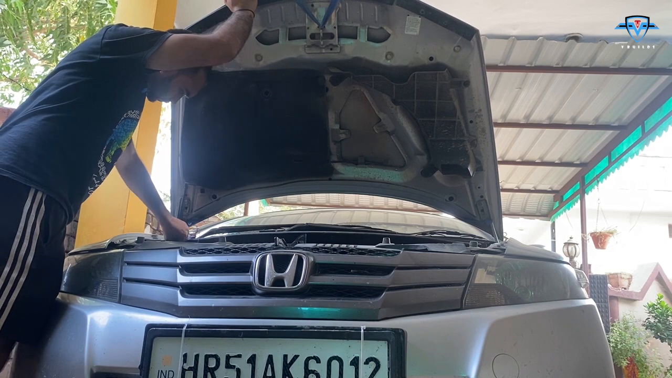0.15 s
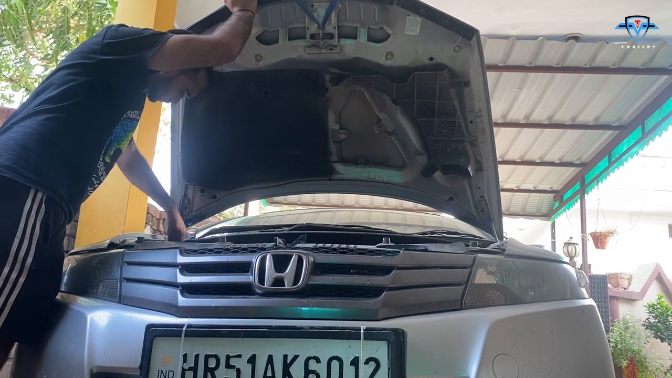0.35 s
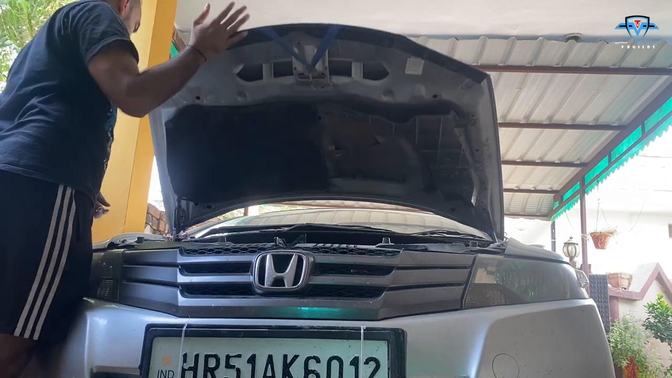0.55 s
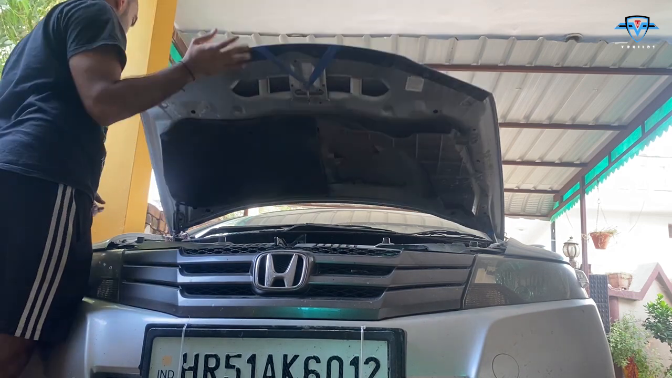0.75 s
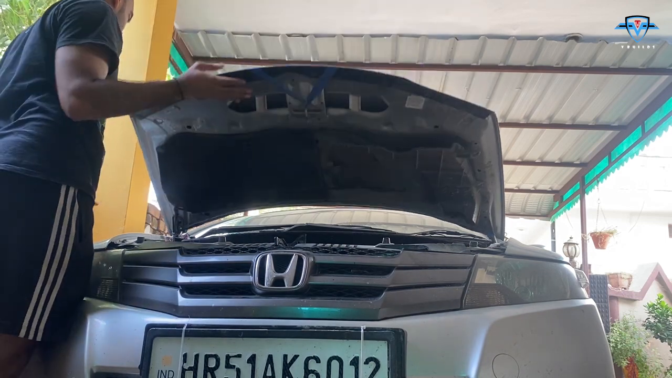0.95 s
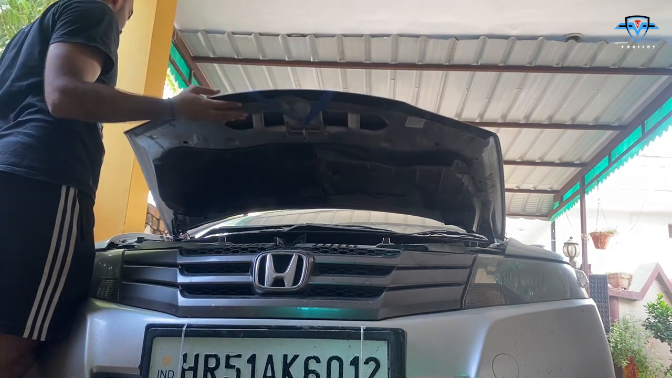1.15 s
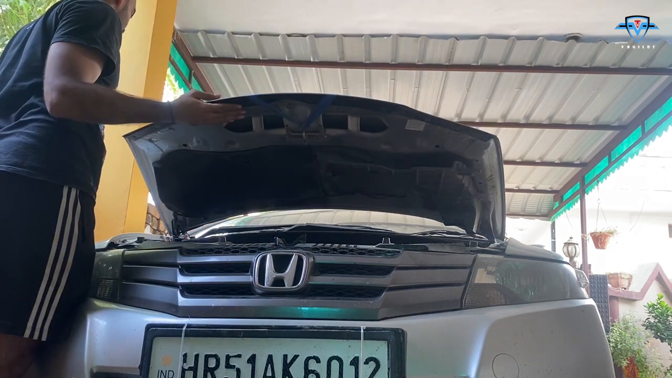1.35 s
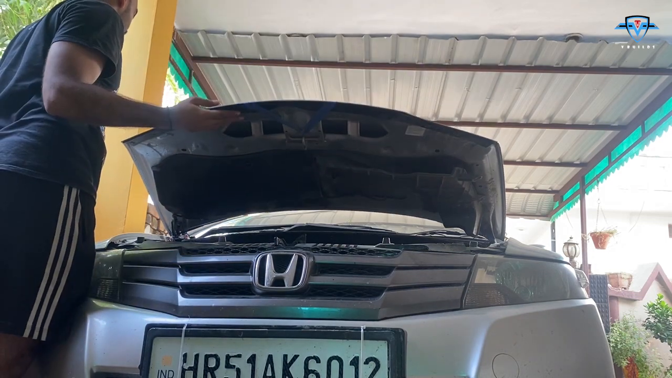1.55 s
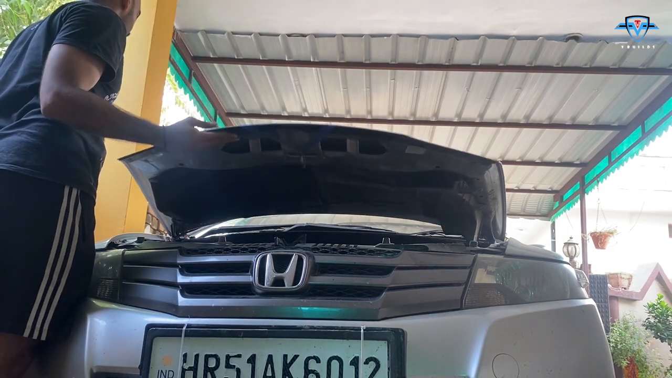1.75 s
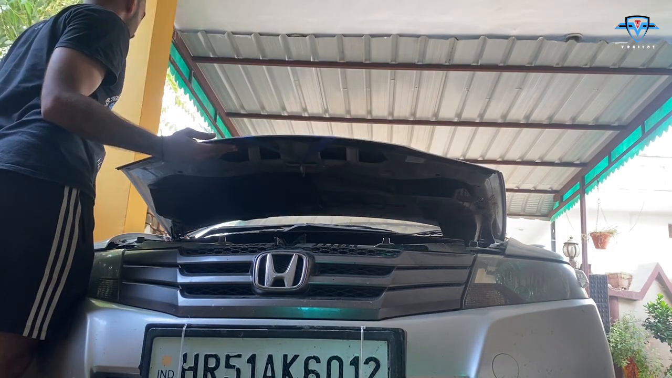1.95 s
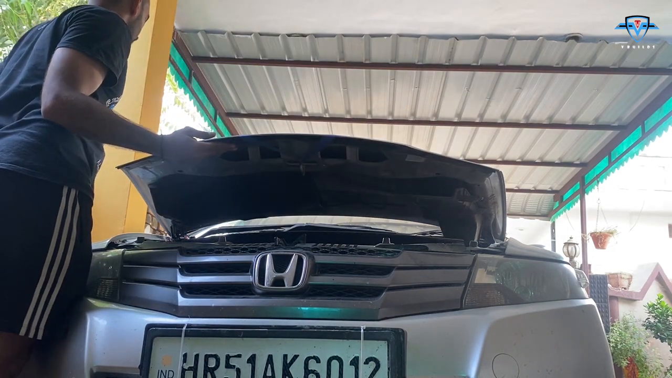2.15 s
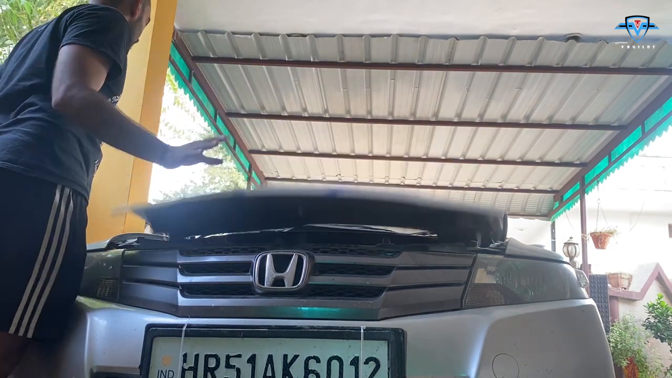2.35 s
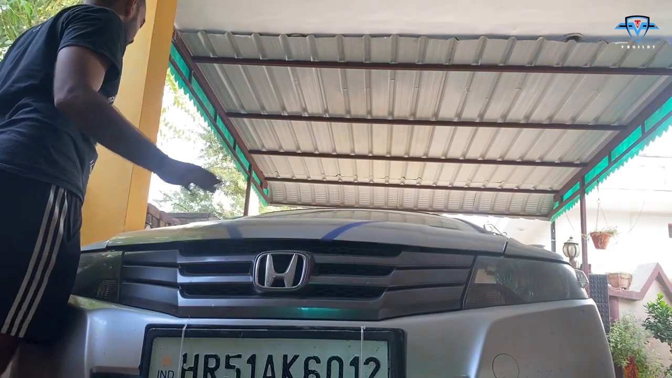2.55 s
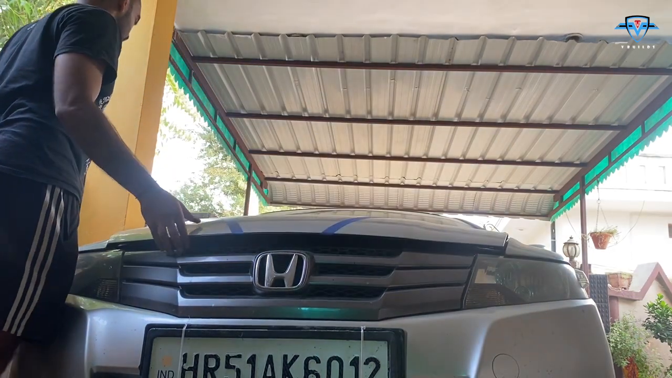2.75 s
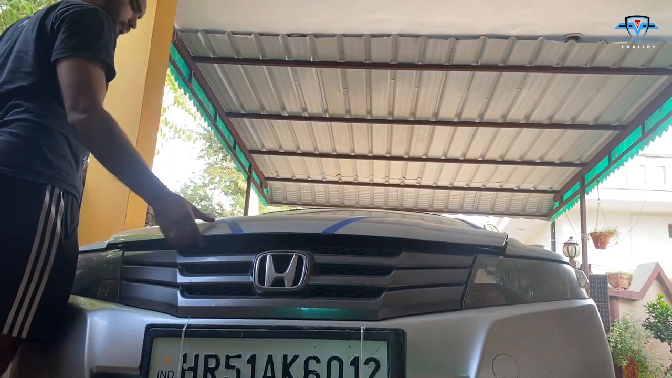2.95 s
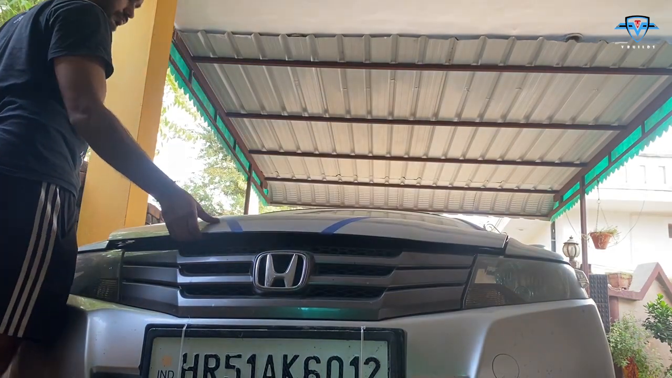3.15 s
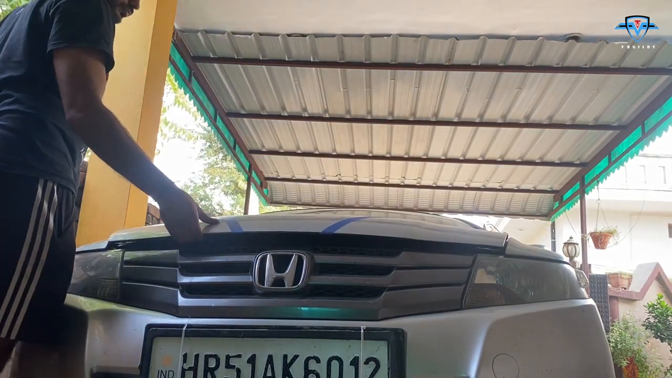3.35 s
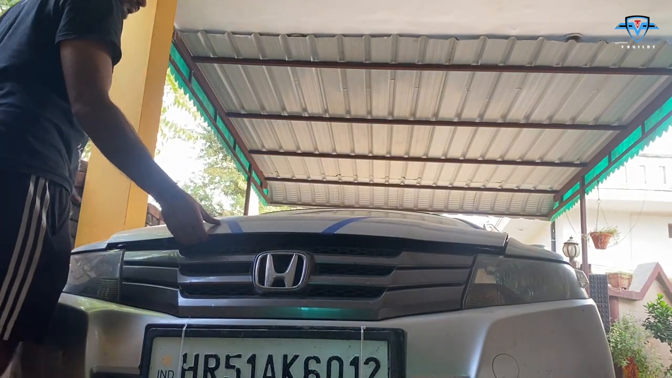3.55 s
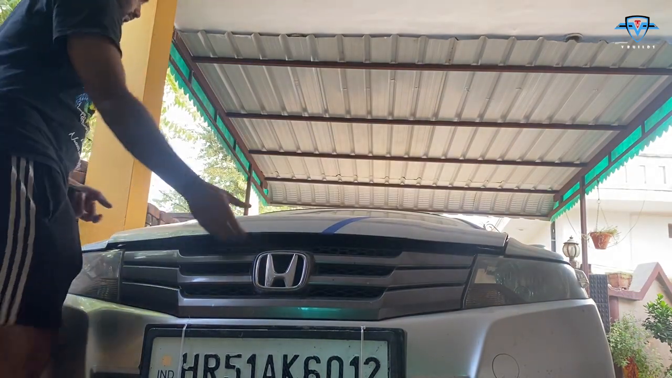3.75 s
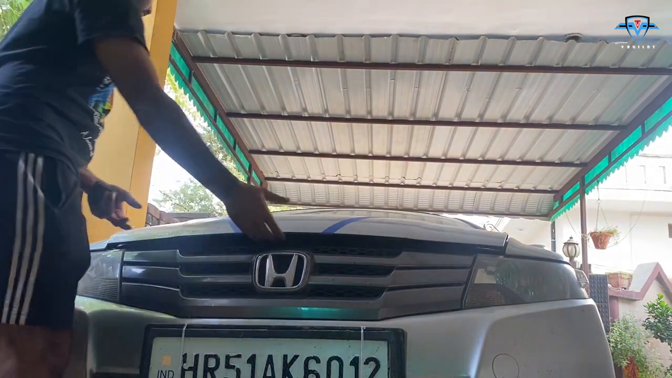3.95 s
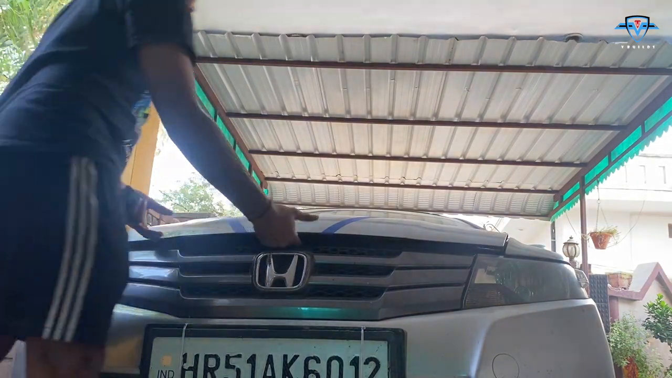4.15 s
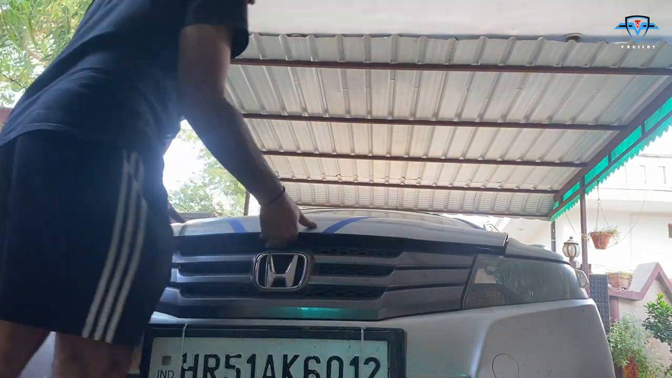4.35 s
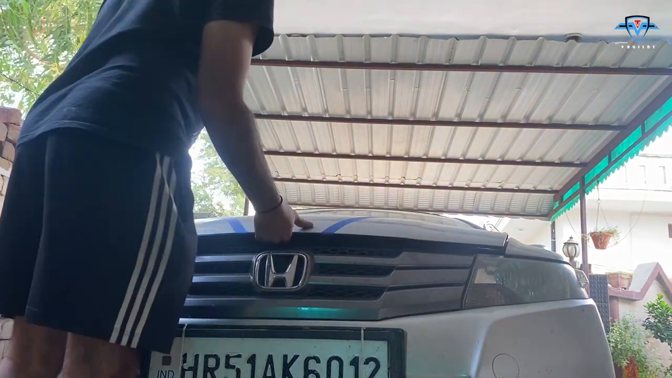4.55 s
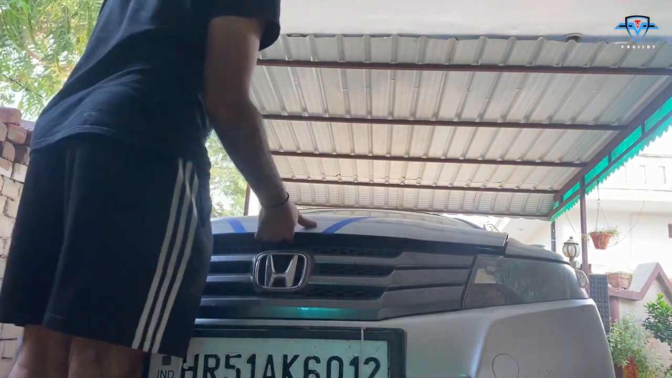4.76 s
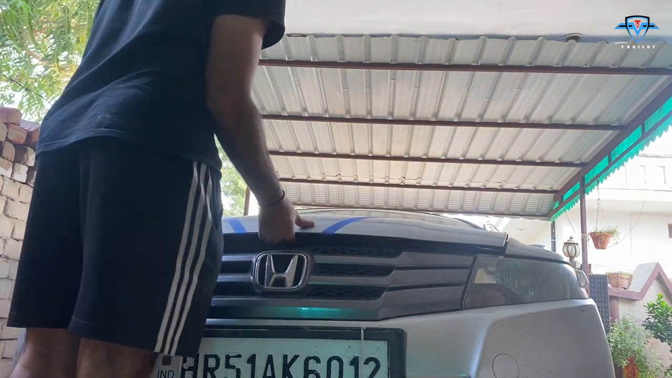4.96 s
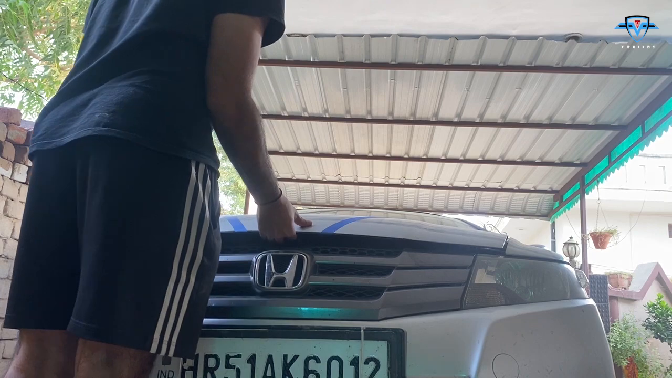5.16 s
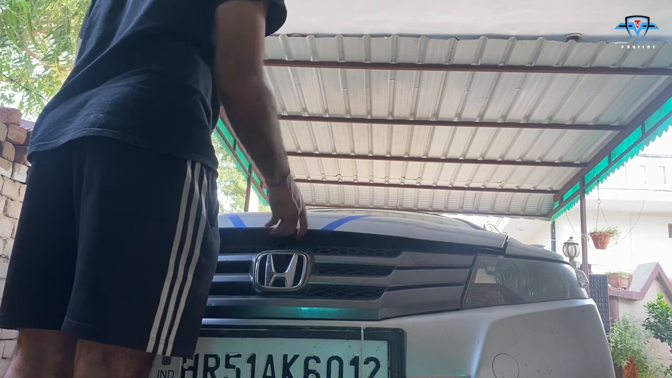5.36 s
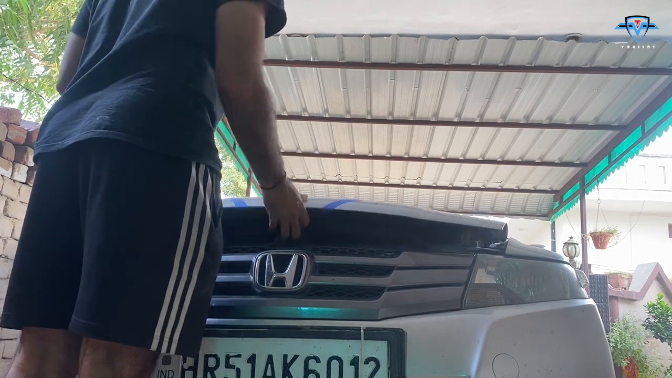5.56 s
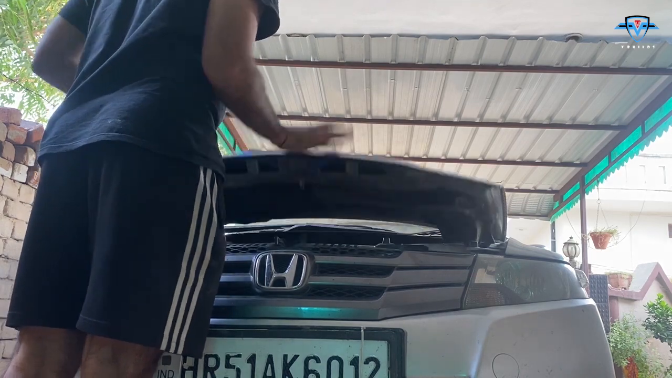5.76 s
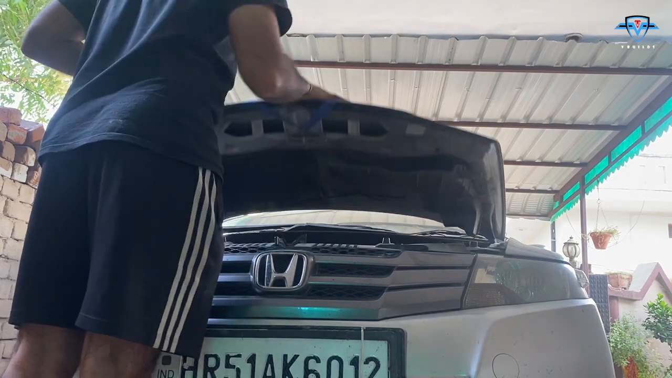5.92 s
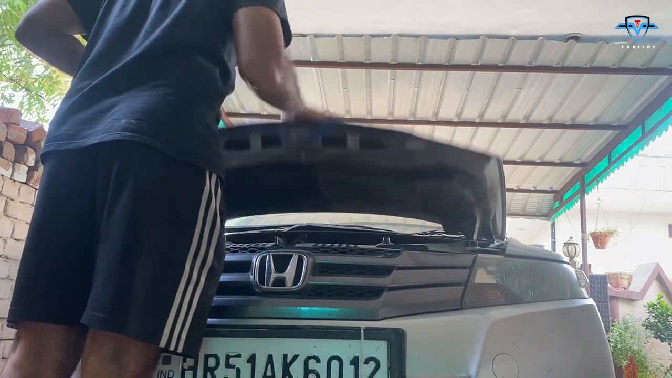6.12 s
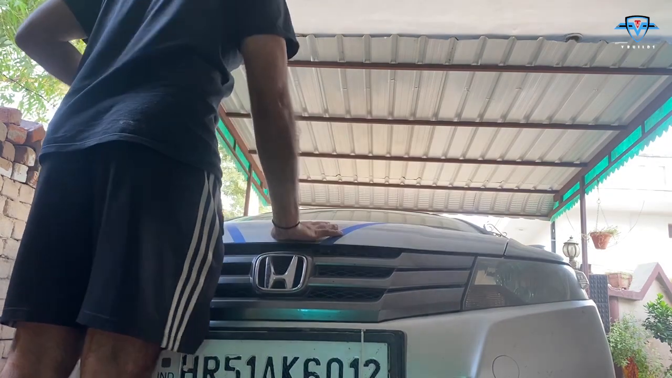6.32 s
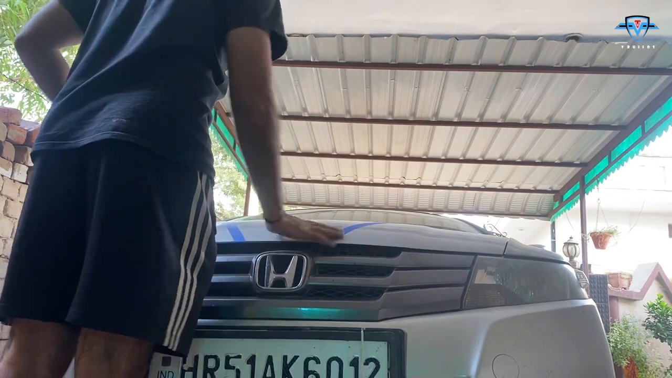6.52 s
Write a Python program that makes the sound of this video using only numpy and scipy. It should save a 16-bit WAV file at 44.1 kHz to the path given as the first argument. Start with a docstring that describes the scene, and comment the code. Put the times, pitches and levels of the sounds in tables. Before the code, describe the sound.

A car bonnet creaks down on its hinges and slams with a metallic crash and boom, then is unlatched, lifted and slammed again under a carport.

```python
"""Under a tin-roofed carport a car's steel bonnet is lowered on scraping hinges and dropped shut.
Feet shuffle, the catch is released, and the bonnet is lifted and slammed again.
Each slam: the latch crashes, then the panel lands on its stops and booms over the engine bay.
Metal is decaying sines plus noise dying by frequency; scrapes are blurred sines with noise;
hum, air and rubbing are shaped noise; fading noise tails make the echoes."""
import sys
import numpy as np
from scipy import signal
from scipy.fft import rfft, irfft, next_fast_len
from scipy.io import wavfile
from scipy.ndimage import map_coordinates

SR = 44100
rng = np.random.default_rng(int(sys.argv[2]) if len(sys.argv) > 2 else 0)


def transcribe(signal):
    """Save signal, clipped to [-1, 1], as a 16-bit WAV file at the path in sys.argv[1]."""
    frames = np.atleast_2d(signal).T
    limited = np.clip(frames, -1, 1)
    pcm = np.round(limited * 32767).astype(np.int16)
    wavfile.write(sys.argv[1], SR, pcm)


N = 294923  # samples


def amp(db):
    """Decibels to gain."""
    return 10 ** (np.asarray(db) / 20)


def unit(x):
    """Scale to rms 1."""
    return x / np.sqrt(np.mean(x ** 2) + 1e-20)


def along(points, hz):
    """Interpolate (freq_hz, value) points on a log frequency axis."""
    point_hz, value = np.transpose(points)
    return np.interp(np.log(hz + 1), np.log(point_hz + 1), value)


def wobble(knots_per_s):
    """Smooth random curve through normally distributed knots."""
    knots = rng.standard_normal(8192)
    return map_coordinates(knots, [np.arange(N) * knots_per_s / SR], mode="wrap")


def filtered(x, response):
    """Multiply the spectrum of x by a response of frequency in Hz."""
    size = x.shape[-1]
    padded = next_fast_len(size + 8192)
    spectrum = rfft(x, padded) * response(np.fft.rfftfreq(padded, 1 / SR))
    return irfft(spectrum, padded)[..., :size]


def add(track, start_s, sound):
    """Mix a sound in at start_s."""
    i = round(start_s * SR)
    track[:, i:i + sound.shape[-1]] += sound[..., :N - i]


# left-right likeness of noise: freq_hz, correlation
LIKENESS = [(100, 0.94), (300, .94), (600, 0.65), (1500, 0.39), (4000, .65), (5700, 0.092), (7000, 1),
            (15000, .94)]


def noise(spectrum, size):
    """Coloured stereo noise of rms 1; left and right are alike by frequency."""
    def mid_side(hz):
        angle = np.arccos(np.clip(along(LIKENESS, hz), 0, .999)) / 2
        return amp(along(spectrum, hz)) * [np.cos(angle), np.sin(angle)]

    mid, side = filtered(rng.standard_normal((2, size)), mid_side)
    return unit(np.array([mid + side, mid - side]))


def crowd(spectrum, t60, attack_s, size):
    """Crowded modes as noise, each frequency dying at its own speed."""
    hz, t, bins = signal.stft(noise(spectrum, size), SR, nperseg=256)
    decay = amp(-60 * t / along(t60, hz)[:, None])
    dying = signal.istft(bins * decay, SR, nperseg=256)[1][:, :size]
    return dying * (1 - np.exp(-np.arange(size) / SR / attack_s))


def ring(modes, attack_s, scatter_db, loose, size):
    """Separate decaying modes, strengths redrawn each time; loose scatters starting phases."""
    t = np.arange(size, dtype=np.float32) / SR
    hz, db, t60_s = np.float32(modes).T[:, :, None]
    strength, phase = np.float32(rng.standard_normal((2, len(modes), 1)))
    decay = np.exp(-t / t60_s * float(np.log(1000)))
    waves = decay * np.sin(2 * np.pi * hz * t + loose * phase)
    return np.sum(amp(db + scatter_db * strength) * waves, 0) * (1 - np.exp(-(t / attack_s) ** 2))


def strokes(rows, release_db_per_s):
    """Gain over time of strokes that rise, hold and die away; overlaps add as power."""
    power = np.zeros((1, N))
    for start_s, rise_s, length_s, level_db, *_ in rows:
        age_s = np.arange(round((length_s + 1) * SR)) / SR
        release_db = release_db_per_s * np.maximum(age_s - length_s, 0)
        gain = amp(level_db - release_db) * (1 - np.exp(-age_s / rise_s))
        add(power, max(start_s, 0), gain ** 2)
    return np.sqrt(power[0])


# hand loads and flexes the bonnet: start_s, rise_s, length_s, level_db
FLEXES = [(.55, .1, 0.86, -63), (1.9, 0.057, 0.16, -72), (3.2, .1, 0.315, -45.5), (3.8, 0.017, 1.27, -55),
          (4.74, 0.025, 0.067, -44.5), (5.25, .02, 0.055, -41), (5.44, 0.022, 0.084, -35)]
# bonnet hum spectrum: freq_hz, relative_db_per_hz
HUM = [(20, -13.5), (42, -15), (63, -3), (90, -4.5), (125, -16), (250, -18.5), (500, -33), (2000, -83.5)]
# outdoor air spectrum: freq_hz, relative_db_per_hz
AIR = [(20, -8.5), (150, -12), (400, -0.5), (2500, -1), (6000, -23.5), (16000, -27.5)]
# faint, distant whistles: start_s, length_s, pitch_hz, level_db
WHISTLES = [(.05, 0.15, 6080, -72), (1.09, 0.12, 2660, -66), (3.073, 0.068, 6100, -70),
            (3.2, 0.068, 2580, -60.5), (5.984, 0.083, 2390, -62.5)]
FLEX_RELEASE_DB_PER_S, HUM_REST_DB, AIR_DB = 74.5, -79.5, -74.5
AFTER_SLAM_RISE_S, AFTER_SLAM_S, AFTER_SLAM_RE_BOOM_DB = .1, 0.586, -31.5


def background():
    """Bonnet hum, rising with flexing and slams, over still outdoor air and distant whistles."""
    shaken = [(start_s, AFTER_SLAM_RISE_S, AFTER_SLAM_S, boom_db + AFTER_SLAM_RE_BOOM_DB)
              for start_s, _, _, boom_db, *_ in SLAMS]
    flex = strokes(FLEXES + shaken, FLEX_RELEASE_DB_PER_S) + amp(HUM_REST_DB)
    out = flex * noise(HUM, N) + amp(AIR_DB) * noise(AIR, N)
    for start_s, length_s, pitch_hz, level_db in WHISTLES:
        band = lambda hz: 1 / (1 + ((hz - pitch_hz) / 110) ** 4)
        blur = unit(filtered(rng.standard_normal((2, SR)), band))
        size = round(length_s * SR)
        add(out, start_s, amp(level_db) * blur[:, :size] * np.hanning(size))
    return out


# echo decay: freq_hz, t60_s
CARPORT_T60 = [(80, 0.99), (250, 0.8), (700, 0.79), (2000, 0.73), (5000, 0.68), (12000, .45)]
# share reflected by roof and walls: freq_hz, relative_db
WALLS = [(50, -2), (300, -1), (1000, -0.5), (3000, -1.5), (7000, -4), (16000, -13)]


def carport(x):
    """Roof and walls answer with swelling, dying noise, redrawn for each overlapping 1 s piece."""
    out = np.zeros((2, N))
    step = SR // 2
    fade = signal.get_window("hann", 2 * step)
    for start in range(0, N, step):
        tail = crowd(WALLS, CARPORT_T60, attack_s=0.012, size=SR)
        piece = x[:, start:start + 2 * step].mean(0)[None] * fade[:N - start]
        echo = signal.fftconvolve(piece, tail / np.linalg.norm(tail[0]), axes=1)
        add(out, start / SR, echo)
    return out


# strokes of soles and clothes: start_s, rise_s, length_s, level_db
STEPS = [(0, 0.012, .65, -68), (.7, 0.0502, .55, -72.5), (1.5, .01, .2, -72), (1.775, 0.0062, .025, -71.5),
         (1.9, 0.011, .03, -65), (2.14, .015, .035, -58), (2.225, .012, .03, -56), (3.39, .02, .07, -53),
         (3.577, 0.013, .055, -43.5), (3.7, 0.016, .08, -52), (3.84, .02, .07, -59.5),
         (4.092, .003, 0.65, -52), (4.2, 0.53, .43, -42), (4.78, 0.016, 1.1, -68.5),
         (5.44, .02, 0.035, -51.5), (5.885, 0.0076, 0.92, -65.5)]
# rubbing spectrum: freq_hz, relative_db_per_hz
RUB = [(100, -14), (500, -3.5), (1100, -2), (2200, 3), (4800, 3), (7000, 0), (11000, -2.5), (15500, -11),
       (17000, -30.5)]
STEP_RELEASE_DB_PER_S, STILL_DB = 278.5, -82.5  # stroke decay; rustle between strokes


def shuffle():
    """Soles and cloth rub with a fine, uneven grain; a harder rub is brighter."""
    effort_db = 20 * np.log10(strokes(STEPS, STEP_RELEASE_DB_PER_S) + amp(STILL_DB))
    rub = noise(RUB, N)
    dull = filtered(rub, lambda hz: 1 / (1 + (hz / 6500) ** 4))
    bright = amp(0.37 * (effort_db + 51.5)) * (rub - dull)
    grain = amp(1.2 * wobble(14) + 1.7 * wobble(35) + 1.4 * wobble(700))
    return amp(effort_db) * unit(grain) * (dull + bright)


# hinges and catch scrape: start_s, rise_s, length_s, level_db, starting_resonance_hz
SCRAPES = [(0.249, 0.092, .1, -52.5, 1202), (0.422, 0.0065, .03, -48.5, 870), (.519, .001, .02, -39, 529.5),
           (.56, 0.071, .13, -37.5, 490.3), (.76, .01, .04, -53, 450), (.85, .02, .75, -68, 559),
           (2.15, .04, .22, -66, 898), (2.286, .005, 0.017, -47.5, 660), (5.44, .025, 0.048, -38.5, 1300),
           (5.896, 0.011, .13, -51.5, 581)]
SINK_SHARE, SINK_S = .26, .13  # final drop of the resonance; time constant


def sinking():
    """Resonance in Hz: starts anew with each scrape and sinks as the joint folds."""
    t = np.arange(N) / SR
    starts_s, *_, start_hz = np.transpose(SCRAPES)
    latest = np.maximum(np.searchsorted(starts_s, t) - 1, 0)
    age_s = np.maximum(t - starts_s[latest], 0)
    return start_hz[latest] * (1 - SINK_SHARE * (1 - np.exp(-age_s / SINK_S)))


def fuzz(width_hz):
    """Low-passed noise of rms 1 that blurs a sine."""
    return unit(filtered(rng.standard_normal(N), lambda hz: 1 / (1 + (hz / width_hz) ** 4)))


# scrape noise spectrum: freq_hz, relative_db_per_hz
SCRAPE = [(100, -10.5), (300, -8), (800, 3), (1600, -5), (3000, -11.5), (6000, -28), (16000, -37)]
SCRAPE_RELEASE_DB_PER_S = 259.5


def hinges():
    """Uneven slips drive noise, a resonance and its octave, which sink as the hinges fold."""
    effort = strokes(SCRAPES, SCRAPE_RELEASE_DB_PER_S)
    phase = 2 * np.pi * np.cumsum(sinking()) / SR
    resonance = fuzz(width_hz=100) * np.sin(phase)
    octave = fuzz(width_hz=680) * np.sin(2 * phase)
    groan = unit(resonance + amp(-11) * octave)
    slips = amp(1.5 * wobble(130))
    return effort * unit(slips * (groan + amp(-1.5) * noise(SCRAPE, N)))


# sprung safety catch snaps: start_s, level_db
CATCH = [(4.825, -44), (5.029, -12), (5.489, -22), (6.2645, -8.5), (2.436, -9.5)]
# spring modes: freq_hz, relative_db, t60_s
SPRING = [(1040, -9.5, 0.086), (1214, -7.5, 0.031), (1305, 3.5, .035), (1480, -10, 0.019),
          (3590, -22, 0.075), (3930, -20.5, 0.062)]


def catch():
    """The spring of the catch gives a short, hollow clack of decaying modes."""
    out = np.zeros((2, N))
    for start_s, level_db in CATCH:
        clack = ring(SPRING, attack_s=.0015, scatter_db=.5, loose=.4, size=SR // 8)
        add(out, start_s, amp(level_db) * clack)
    return out


# striker taps the hook: start_s, pitch_hz, level_db
PINGS = [(3.126, 2240, -58), (3.2565, 2200, -36), (5.259, 2008, -31.5)]
# hook modes: multiple_of_pitch, relative_db, t60_s
HOOK = [(.92, -2.5, .12), (1, -1.5, .14)]


def hook():
    """The loose hook pings in two close modes when the striker taps it."""
    out = np.zeros((2, N))
    for start_s, pitch_hz, level_db in PINGS:
        modes = np.array(HOOK) * [pitch_hz, 1, 1]
        ping = ring(modes, attack_s=.001, scatter_db=.5, loose=1, size=SR // 4)
        add(out, start_s, amp(level_db) * ping)
    return out


# low modes of the bonnet over the engine bay: freq_hz, relative_db, t60_s
BOOM = [(62, 2, 0.46), (68.36, -10.5, 0.8), (90.14, -5.5, 0.67), (140.4, -19.5, 0.89), (167.2, -11.5, .55)]


def boom(attack_s):
    """The whole bonnet heaves in low modes, much the same way at every blow."""
    return ring(BOOM, attack_s, scatter_db=.5, loose=.2, size=SR)


# higher modes of the sheet steel: freq_hz, relative_db, t60_s
SHEET = [(244, -5, 0.22), (261.4, -8, 0.1), (277, -8, 0.35), (319, -3, 0.15), (366.6, 1.5, 0.44),
         (393, -0.5, 0.4), (471, -3, 0.4), (545, -9.5, 0.34), (621, -8, .45), (714.7, -8.5, 0.78),
         (764, -3.5, 0.57), (833, -11.5, 0.25), (990, -14.5, 0.28), (1052, -13, 0.38), (1084, -6, 0.24),
         (1164, -10.5, 0.27), (1178, -9.5, 0.29), (1270, -4.5, 0.32)]
# crowded panel modes: freq_hz, relative_db_per_hz
PANEL = [(40, -20), (120, -6.5), (230, -4), (360, 0), (520, -2), (750, -4), (1300, -11), (1800, -12),
         (3500, -26), (7000, -31), (16000, -51.5)]
# their decay: freq_hz, t60_s
PANEL_T60 = [(100, 0.5), (400, 0.48), (1200, 0.38), (4000, 0.41), (12000, .16)]


def panel(attack_s):
    """The sheet steel rings with a few strong modes among many crowded ones."""
    modes = ring(SHEET, attack_s, scatter_db=1.5, loose=2, size=SR // 2)
    return crowd(PANEL, PANEL_T60, attack_s, size=SR // 2) + amp(-11.5) * modes


# striker and latch plate modes: freq_hz, relative_db, t60_s
STEEL = [(1184, 6, 0.18), (1792, -3.5, .12), (1886, -4.5, .16), (2036, -6, 0.13), (2200, -6, 0.13),
         (2383, -3.5, 0.15), (2564, 2.5, 0.12), (2655, -2, 0.069), (3214, -1, 0.31), (3573, -4.5, .1),
         (3870, -7.5, 0.053), (4280, -5, 0.11), (4760, -10.5, 0.12), (5000, -3.5, 0.12), (5500, -7.5, .09),
         (6720, -7, .09), (6860, -5, 0.12), (7095, -7.5, 0.12)]
# dense latch crash: freq_hz, relative_db_per_hz
LATCH = [(60, -12), (300, -8.5), (800, -6.5), (1250, 5.5), (1600, -4.5), (2150, -8), (2600, 3), (3500, 0.5),
         (5000, -0.5), (7000, -5), (11000, -8.5), (15000, -15), (17000, -27.5)]
# its decay: freq_hz, t60_s
LATCH_T60 = [(300, 0.15), (1500, 0.19), (4000, 0.13), (12000, 0.17)]


def latch(attack_s):
    """The latch rings with steel modes in a dense crash."""
    modes = ring(STEEL, attack_s, scatter_db=1.5, loose=2, size=SR // 6)
    return crowd(LATCH, LATCH_T60, attack_s, size=SR // 6) + amp(-13.0) * modes


def softened(x, contact_hz):
    """A soft, long contact leaves the high modes quiet: low-pass."""
    sos = signal.butter(2, min(contact_hz, SR / 3), fs=SR, output="sos")
    return signal.sosfilt(sos, x)


# _DB: panel or boom level against the slam (shudder: both against its boom); _HARD_DB: click over panel
LOCK_S, LOCK_DB, LOCK_HARD_DB, LOCK_BOOM_DB = .0125, -5.5, 1.5, -15
REBOUND_GAP_S, REBOUND_DB, REBOUND_LOSS_DB, REBOUND_BOOM_DB = .039, -7.5, 5, -13
SHUDDER_S, SHUDDER_GAP_S, SHUDDER_DB = .22, .085, -17.5
SHUDDER_HARD_DB, SHUDDER_BOOM_DB = -27, -22


def aftermath():
    """Knock rows after each slam: latch locks, bonnet hops twice on its stops, sheet shudders softly."""
    rows = []
    for start_s, _, panel_db, boom_db, _, rebound_s, hard_db in SLAMS:
        rows.append((start_s + LOCK_S, panel_db + LOCK_DB, LOCK_HARD_DB, boom_db + LOCK_BOOM_DB))
        for k in range(2):
            loss_db = k * REBOUND_LOSS_DB
            hop_s = start_s + rebound_s + k * REBOUND_GAP_S
            rows.append((hop_s, panel_db + REBOUND_DB - loss_db, hard_db,
                         boom_db + REBOUND_BOOM_DB - loss_db))
            shudder_s = start_s + SHUDDER_S + k * SHUDDER_GAP_S
            rows.append((shudder_s, boom_db + SHUDDER_DB - loss_db / 2, SHUDDER_HARD_DB,
                         boom_db + SHUDDER_BOOM_DB))
    return rows


# hand, catch and stops knock on the bonnet: start_s, panel_db, hardness_db (click over panel), boom_db
KNOCKS = [(.427, -65, 9, -85), (.519, -50.5, -1, -72), (1.036, -51.5, -15, -52), (1.375, -66, 2, -83),
          (1.443, -62.5, -0.5, -83), (1.516, -59.5, 5, -76), (3.124, -43, -10, -46),
          (3.2561, -31.5, -6, -41), (3.3366, -29.5, -3, -35.5), (4.742, -44, -17, -47),
          (4.822, -44.5, -16, -44), (5.025, -45, 8, -68), (5.035, -33.5, -1.5, -39),
          (5.259, -22, -7.5, -38), (5.285, -26.5, -26, -57.5), (5.487, -37, -3.5, -41),
          (5.692, -37, -23.5, -59.5), (5.831, -44, -11.5, -63), (5.892, -40.5, -15.5, -35.5)]
CONTACT_HZ, HARD_DB_PER_OCTAVE = 2510, 12.5  # harder contact reaches higher panel modes


def knocks():
    """Lighter contacts and rebounds excite the same latch, panel and boom."""
    out = np.zeros((2, N))
    for start_s, panel_db, hard_db, boom_db in KNOCKS + aftermath():
        click = latch(attack_s=0.00086)
        click = click * np.exp(-np.arange(click.shape[1]) / SR / 0.039)
        contact_hz = CONTACT_HZ * 2 ** (min(hard_db, 2) / HARD_DB_PER_OCTAVE)
        add(out, start_s, amp(panel_db + hard_db) * click)
        add(out, start_s, amp(panel_db) * softened(panel(attack_s=0.0033), contact_hz))
        add(out, start_s, amp(boom_db) * boom(attack_s=0.02))
    return out


# bonnet shuts: start_s, latch_db, panel_db, boom_db, landing_delay_s, rebound_delay_s, rebound_hardness_db
SLAMS = [(2.425, -10, -11, -13, .030, .063, -3.5), (6.2605, -11, -12, -8, .019, .074, -16)]


def slams():
    """The striker grazes the hook, crashes into the latch and shakes the panel, which then lands."""
    steel, body = np.zeros((2, 2, N))
    for start_s, latch_db, panel_db, boom_db, landing_s, *_ in SLAMS:
        add(steel, start_s - .010, amp(latch_db - 17.0) * latch(attack_s=0.0056))
        add(steel, start_s, amp(latch_db) * latch(attack_s=0.0015))
        add(body, start_s, amp(panel_db - 12) * panel(attack_s=0.0071))
        add(body, start_s + landing_s, amp(panel_db) * panel(attack_s=0.0026))
        add(body, start_s + landing_s, amp(boom_db) * boom(attack_s=0.012))
    rattle = unit(amp(1.8 * wobble(350)))  # loose parts chatter
    return steel * rattle + body


def scene():
    """Car and person under the roof; the catch, close behind the grille, feeds the echoes less."""
    car = slams() + knocks() + hook() + hinges()
    clack = catch()
    echoes = amp(-13.0) * carport(car + amp(-6.5) * clack)
    return car + clack + echoes + shuffle() + background()


# level between left and right channels: freq_hz, left_minus_right_db
LEFT_DB = [(100, 1), (600, -0.8), (1200, 0.4), (2500, 2), (5000, 4.5), (6800, 0.4), (16000, 0)]
# phase between left and right channels: freq_hz, left_lead_rad
LEFT_LEAD = [(50, 0), (300, -.25), (800, .5), (1700, .1), (3200, .75), (5000, .2), (7300, 0), (9000, -3.14),
             (11100, -6.28), (13300, -9.42), (15000, -12.57)]
TOP_HZ = 15900


def record(dry):
    """The recorder's two channels differ in level and phase, shed deep bass and round off loud peaks."""
    side = np.array([[.5], [-.5]])
    lean = signal.sosfilt(signal.butter(2, 38, "high", fs=SR, output="sos"), dry)

    def channels(hz):
        return amp(side * along(LEFT_DB, hz)) * np.exp(1j * side * along(LEFT_LEAD, hz))

    pair = filtered(lean, channels)
    rounded = pair / (1 + np.abs(pair / .95) ** 6) ** (1 / 6)
    return filtered(rounded, lambda hz: hz < TOP_HZ)


dry = scene()
out = record(dry)
transcribe(out)
```